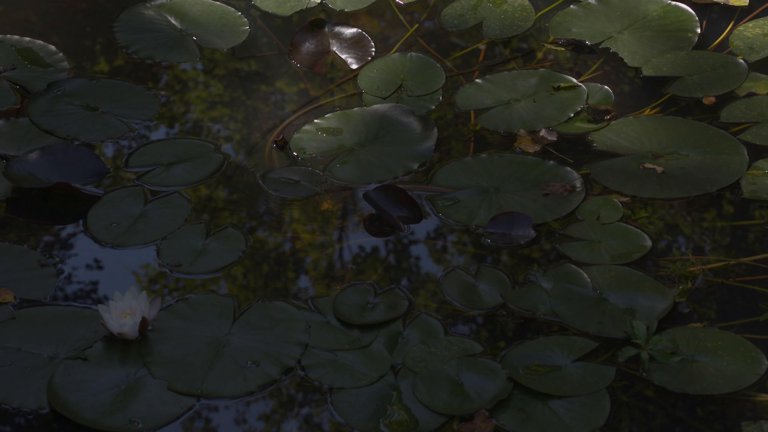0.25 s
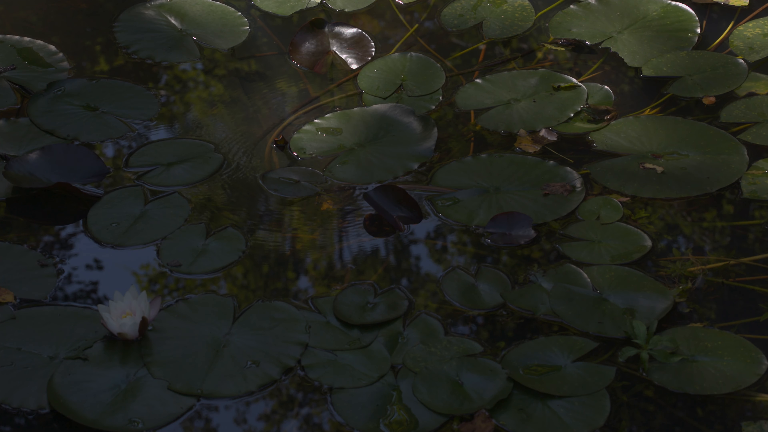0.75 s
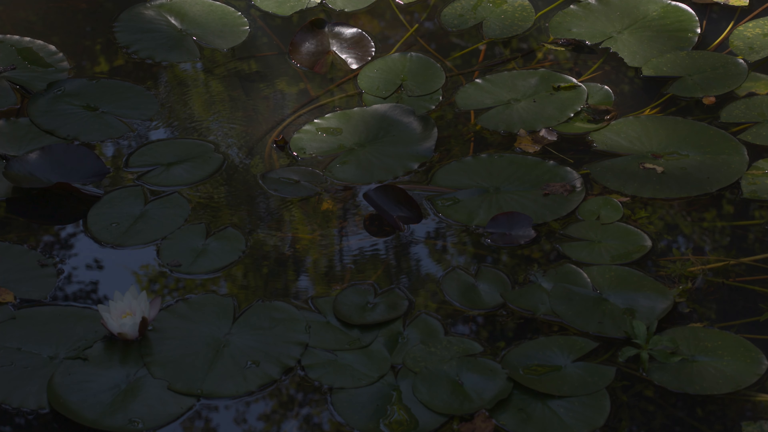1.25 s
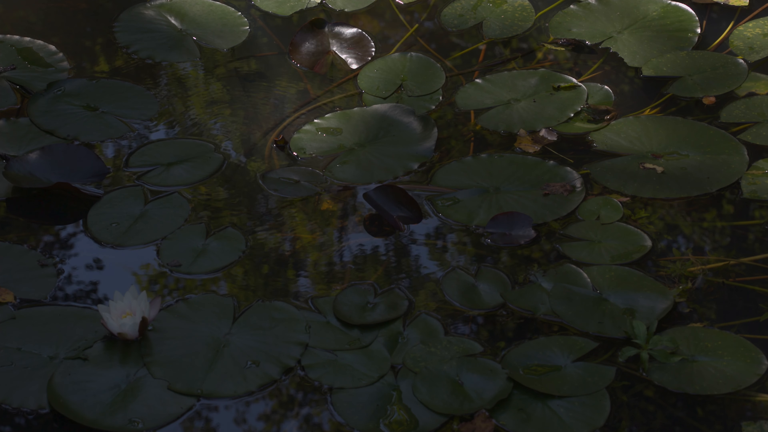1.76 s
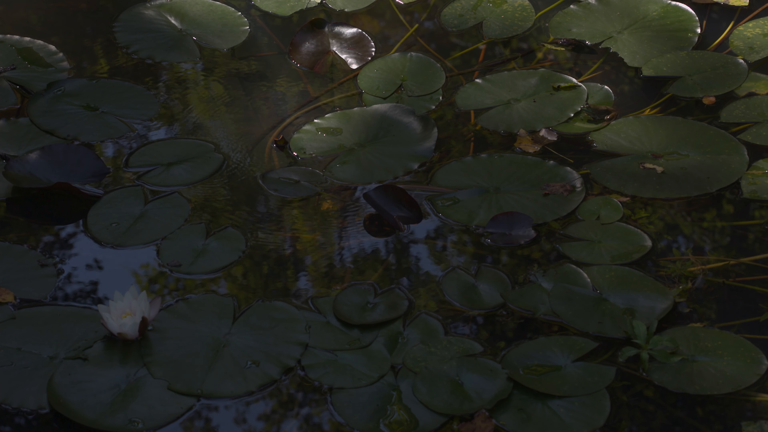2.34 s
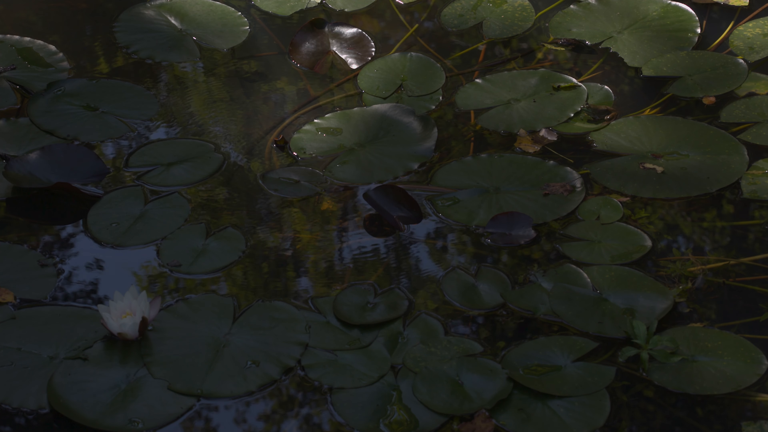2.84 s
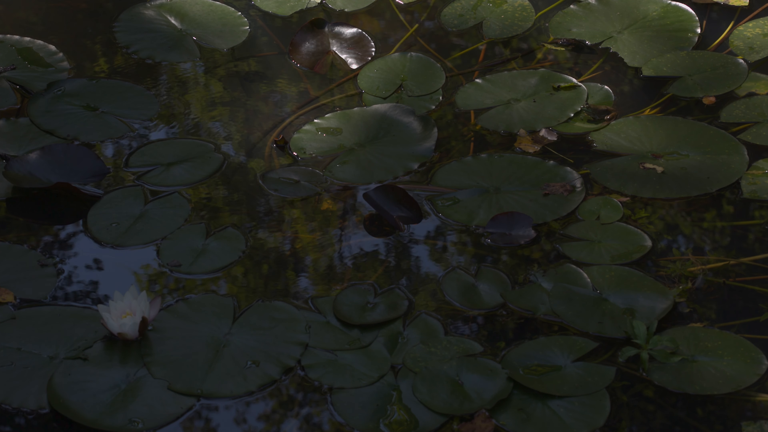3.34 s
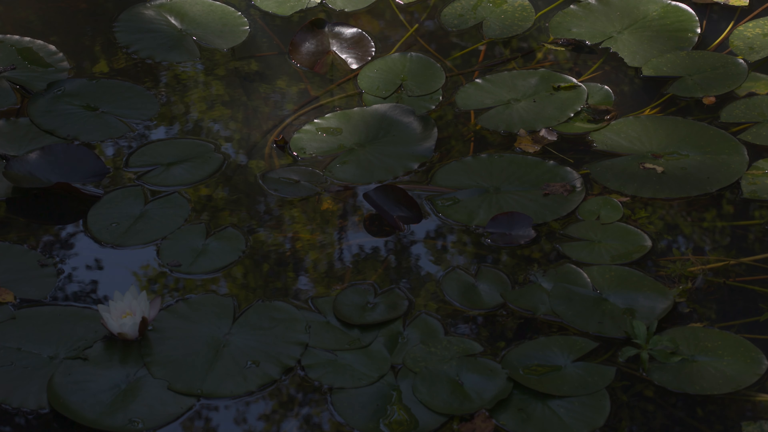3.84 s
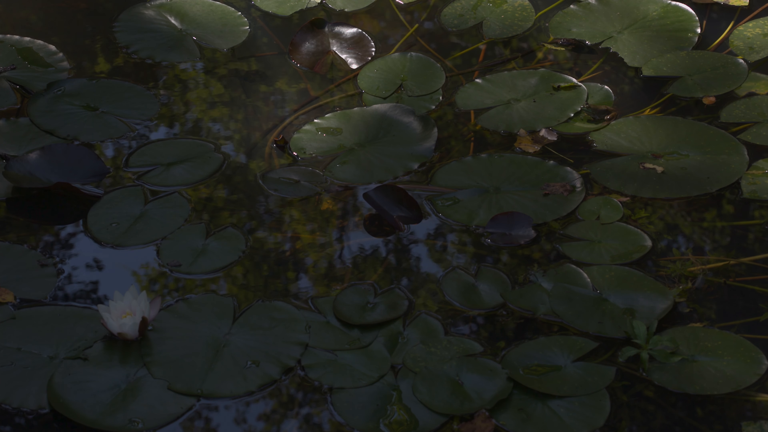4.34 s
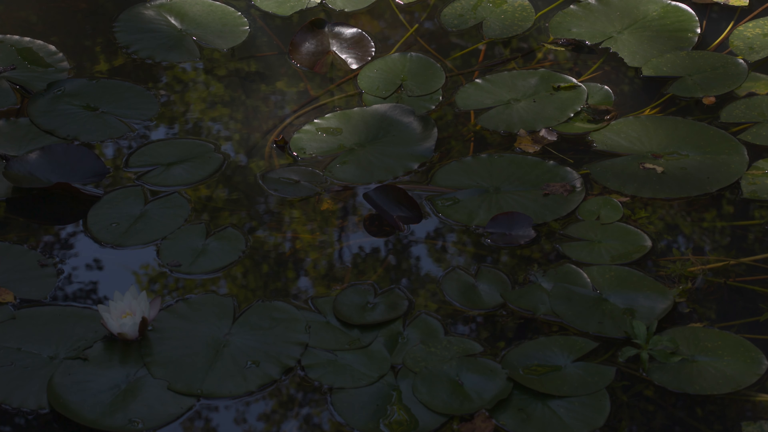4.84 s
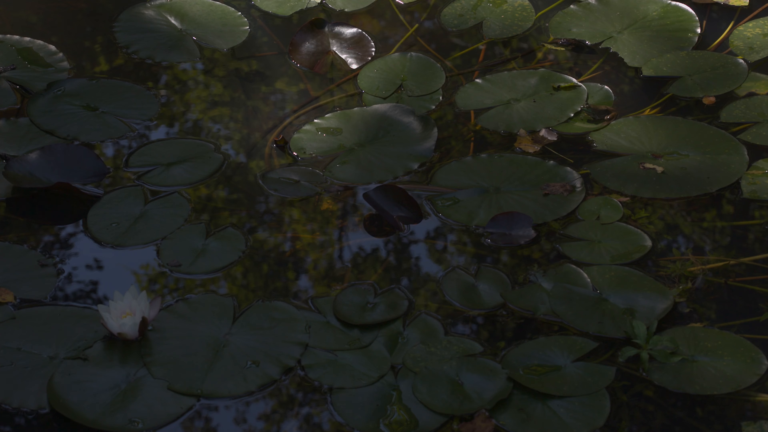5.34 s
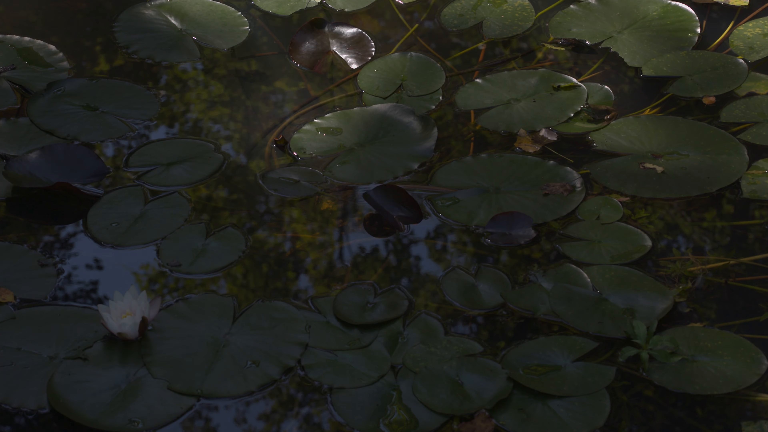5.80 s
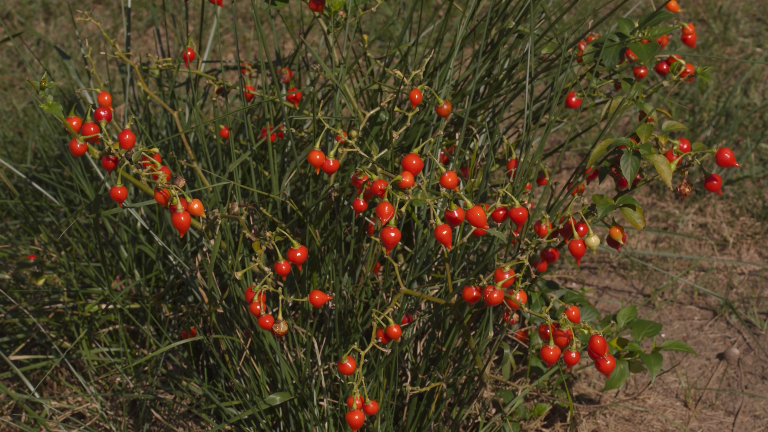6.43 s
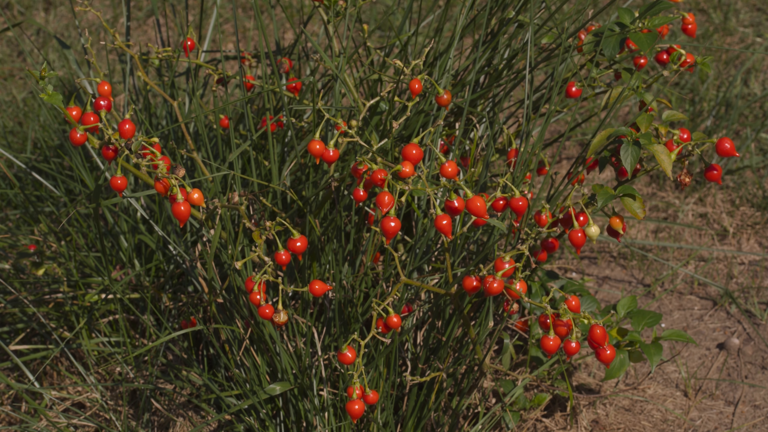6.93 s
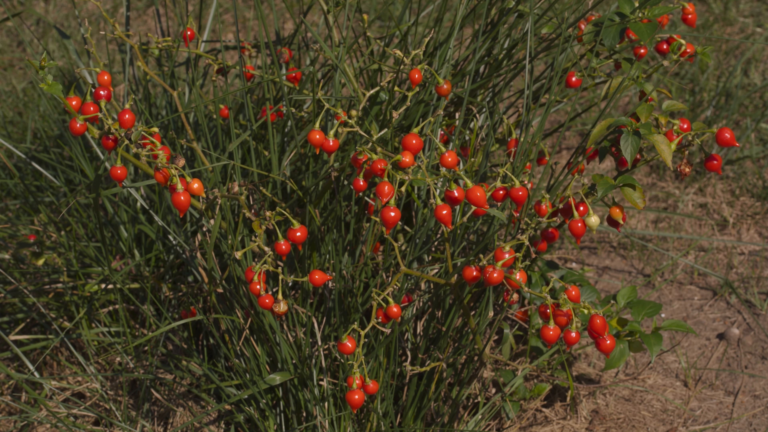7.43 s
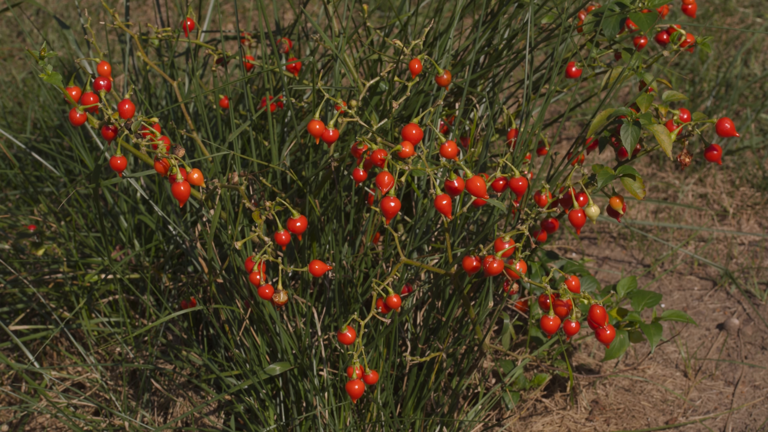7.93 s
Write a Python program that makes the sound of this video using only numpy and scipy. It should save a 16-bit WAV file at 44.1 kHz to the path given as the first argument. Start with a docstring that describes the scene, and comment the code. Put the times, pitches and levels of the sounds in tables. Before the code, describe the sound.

Beside a lily pond, one nearby cricket chirps in quick triple pulses over a shimmer of distant crickets, trills and faint, high katydid buzzes. A crow caws far across the water, at first sparsely, then in a run that echoes off the trees. The sound switches abruptly to a garden, where much closer crickets overlap with rasping buzzes and one soft low bump. A low outdoor rumble and faint hum continue throughout.

```python
"""A near field cricket chirps in threes beside a lily pond, over distant crickets, trills and katydid buzzes.
A crow caws far across the pond; at CUT_S the scene cuts to a sunny garden with closer, overlapping insects.
Wing strokes are gliding sines, buzzes throbbing noise, caws hoarse sines with tree echo.
A low outdoor rumble of shaped noise and a faint hum lie under both places."""
import sys
import numpy as np
from scipy import signal
from scipy.fft import rfft, irfft, next_fast_len
from scipy.io import wavfile
from scipy.ndimage import uniform_filter1d

SR = 44100
rng = np.random.default_rng(int(sys.argv[2]) if len(sys.argv) > 2 else 0)


def generate_wav(signal):
    """Clip the signal to [-1, 1] and save it as 16-bit WAV at the path in sys.argv[1]."""
    frames = np.transpose(np.atleast_2d(signal))
    scaled = np.clip(frames, -1, 1) * 32767
    pcm = np.round(scaled).astype(np.int16)
    wavfile.write(sys.argv[1], SR, pcm)


N = 359856

CUT_S, TOP_HZ = 6.298, 15750
HOARSE_PER_S, HOARSE_MAX = 4.6, .63  # the longer a caw, the hoarser (0-1)

# near pond cricket's chirps: mid first stroke t/s, base level/dB
POND_CHIRPS = [(-.053, -25), (.297, -25.5), (.710, -25.5), (1.046, -25.5), (1.403, -25.5), (1.763, -25.5),
               (2.101, -26), (2.418, -26), (2.824, -25), (3.144, -25.5), (3.489, -27), (3.869, -26),
               (4.237, -26), (4.579, -24.5), (4.997, -27), (5.622, -27), (6.010, -26.5)]
# wing strokes of one chirp: delay t/s, length t/s, relative level/dB
CHIRP_STROKES = [(0, 0.022, 0.5), (.037, 0.031, 0.5), (.078, .027, 1)]
# garden field crickets, by name: stroke spacing t/s, stroke length t/s, pitch fall/share;
# offsets of a chirp's first stroke: level/dB, flatter/share, shorter/share
GARDEN_SINGERS = {"loud": (.0385, .026, .125, -.3, .015, .25), "high": (.038, .023, .09, -7, .035, .2),
                  "low": (.038, .024, .11, -6, .035, .35), "brisk": (.0345, .017, .07, -6, .03, .2)}
# garden chirps: mid first stroke t/s, singer, strokes/count, base f/Hz, base level/dB
GARDEN_CHIRPS = [(6.313, "loud", 2, 4790, -18), (6.328, "low", 3, 4580, -18),
                 (6.331, "high", 3, 5190, -18.5), (6.442, "brisk", 4, 4680, -18),
                 (6.578, "loud", 3, 4750, -17.3), (6.657, "high", 3, 5180, -20),
                 (6.736, "low", 3, 4600, -18.5), (6.766, "brisk", 2, 4800, -17.5),
                 (6.856, "loud", 2, 4810, -20), (6.879, "loud", 3, 4780, -18.3),
                 (6.968, "high", 3, 5190, -20), (7.038, "brisk", 3, 4830, -17),
                 (7.159, "low", 4, 4620, -18), (7.199, "loud", 3, 4790, -16.8),
                 (7.297, "high", 3, 5190, -20), (7.456, "low", 2, 4560, -26), (7.533, "loud", 2, 4770, -16),
                 (7.565, "brisk", 3, 4840, -17.5), (7.735, "low", 4, 4660, -18),
                 (7.753, "high", 3, 5190, -19.5), (7.792, "loud", 3, 4790, -16.3),
                 (7.897, "brisk", 2, 4890, -22.5), (8.048, "brisk", 4, 4790, -20),
                 (8.071, "loud", 3, 4770, -17)]
# trilling crickets: f/Hz, stroke rate/Hz, time of one stroke t/s, pitch fall/share,
# sounding part of cycle/share, rms level/dB
POND_TRILLS = [(3504, 45, 0.031, .1, .7, -66.5), (5648, 77, 0.0035, .1, .8, -53.5),
               (6970, 34, .01, 0.018, .7, -66.5), (8420, 16.5, .747, .06, .5, -63)]
GARDEN_TRILLS = [(5550, 77, 0.011, .08, .8, -45.5), (6485, 42, 0, .05, 0.53, -48.5),
                 (6850, 42, .01, .04, 0.72, -54)]
# pond trill that pauses: columns as above, level before the pause is cut out
PAUSING_TRILL = [(6510, 42, 0, .04, .7, -60)]
# its pause: from t/s, to t/s
PAUSE_S = (3.1, 3.78)
# two close garden trills drifting in and out of step: columns as above
NEAR_TRILLS = [(8370, 18.08, 6.739, .09, .46, -40.6), (8300, 17.1, 7.424, .03, .38, -43.8)]
# crow caws: start t/s, length t/s, top f/Hz, direct rms level/dB
CAWS = [(0.145, 0.092, 1220, -55.5), (1.423, 0.16, 1260, -57), (3.142, 0.18, 1440, -46),
        (3.438, 0.093, 1397, -39.5), (3.719, 0.092, 1400, -39.5), (4.02, 0.13, 1370, -40.5),
        (4.348, .08, 1390, -40), (4.658, .085, 1410, -40), (4.98, 0.18, 1394, -49.5),
        (5.328, .23, 1406, -51.5), (5.725, 0.17, 1403, -48), (6.088, 0.19, 1420, -49)]
# katydid buzzes: start t/s, length t/s, rms level at the end/dB (garden: before the ground reflection)
POND_BUZZES = [(.45, .47, -62), (1.15, .6, -66), (1.95, .48, -63), (2.85, .68, -64), (3.62, .58, -59.5),
               (5.15, .9, -59.5)]
POND_HIGH_BUZZES = [(.55, .4, -66), (2, .48, -62), (3.8, .42, -66)]
GARDEN_BUZZES = [(6.1, 1.71, -35.8), (7.97, .8, -39)]
# katydid rasp spectra: f/Hz, relative density level/dB
POND_BUZZ_COLOUR = [(7000, -40), (10000, -1), (12300, 8), (14000, 2), (15000, 4), (16000, -13)]
GARDEN_BUZZ_COLOUR = [(6000, -37), (8800, -9), (10500, -2.5), (12000, 0), (13600, -0.5), (14400, -2),
                      (16000, -7)]
HIGH_BUZZ_COLOUR = [(8000, -27), (11000, -6), (14000, 5), (15200, 11), (16000, -13)]
# merged far insect spectra: f/Hz, relative density level/dB
POND_FAR = [(3900, -39), (4120, -17), (4280, -5), (4600, 0.5), (5000, -1), (5250, -1), (5600, -6),
            (6000, -13), (6450, -19), (7200, -31), (7700, -22), (8300, -14), (9000, -27), (11000, -57)]
GARDEN_FAR = [(3100, -38), (3900, -19.5), (4400, -3), (5100, 0.5), (5600, -3), (6000, -8), (6400, -12.5),
              (7200, -21.5), (8000, -4), (8700, -22), (11000, -37)]
# outdoor rumble spectra: f/Hz, relative density level/dB
POND_AIR = [(20, -14.5), (40, -3), (60, 0), (100, -3.5), (150, -9), (220, -20), (400, -25), (700, -26.5),
            (1100, -25), (2000, -30), (4000, -31.5), (9000, -32), (16000, -38.5)]
GARDEN_AIR = [(20, -15), (40, -0.5), (60, -1), (100, 0.5), (150, -8), (220, -19), (285, -17.5),
              (400, -24.5), (700, -27.5), (1100, -26.5), (2000, -29), (4000, -28.5), (16000, -42)]
# crow throat noise spectrum: f/Hz, relative density level/dB
CROW_RASP = [(600, -12), (850, -9), (1050, -11), (1250, 12), (1480, -10), (1650, -15), (2100, -6),
             (2700, -40)]
# tree cricket bed spectrum: f/Hz, relative density level/dB
TREE_CRICKETS = [(2950, -22.5), (3200, -2), (3450, -1.5), (3680, -0.5), (3820, -25), (5000, -60)]


def undb(db):
    """Decibels to gain."""
    return 10 ** (np.asarray(db) / 20)


def level(x, db):
    """Scale to an rms level."""
    return x * undb(db) / np.sqrt(np.mean(x ** 2) + 1e-18)


def clock():
    """Time of every sample, s."""
    return np.arange(N) / SR


def span(length_s):
    """Ramp from 0 to 1 lasting length_s."""
    return np.linspace(0, 1, max(int(length_s * SR), 2))


def add(out, start_s, x):
    """Mix a short sound in from start_s, trimmed to the scene."""
    i = int(round(start_s * SR))
    a, b = max(i, 0), min(i + len(x), N)
    if b > a:
        out[a:b] += x[a - i:b - i]


def walk(rate_hz, size=N):
    """Smooth random signal of rms 1: held values, twice averaged."""
    k = max(int(SR / rate_hz), 1)
    held = np.repeat(rng.standard_normal(size // k + 2), k)
    smooth = uniform_filter1d(uniform_filter1d(held, k), k)
    return level(smooth[:size], 0)


def noise(colour):
    """Noise of rms 1, its spectrum interpolated over log frequency."""
    size = next_fast_len(N, True)
    hz, db = np.transpose(colour)
    f_hz = np.maximum(np.arange(size // 2 + 1) * SR / size, 1)
    gain = undb(np.interp(np.log(f_hz), np.log(hz), db))
    spectrum = rfft(rng.standard_normal(size)) * gain
    return level(irfft(spectrum, size)[:N], 0)


def scatter(x, t60_s):
    """Diffuse echo from leaves and trees: unit-energy decaying noise tail."""
    t = np.arange(SR) / SR
    tail = rng.standard_normal(SR) * undb(-60 * t / t60_s)
    return signal.oaconvolve(x, tail / np.linalg.norm(tail))[:N]


def bounce(x, delay_s, db):
    """A sound together with one delayed reflection."""
    return x + undb(db) * np.interp(clock() - delay_s, clock(), x, left=0)


def wing(u, hz, fall, rise=0, overtone_db=-27, skew=1.2, edge=0.61, unsteady=.004):
    """Scraper runs along the file (u 0-1); pitch climbs as the wing speeds up and sags as it slows."""
    u = np.clip(u, 0, 1)
    speed = 1 - rise * (1 - u) ** 3 - fall * u ** 3
    pitch_hz = hz * speed * (1 + unsteady * walk(500, size=len(u)))
    phase = 2 * np.pi * np.cumsum(pitch_hz) / SR
    envelope = np.abs(np.sin(np.pi * u ** skew)) ** edge
    return envelope * (np.sin(phase) + undb(overtone_db) * np.sin(2 * phase))


def pond_cricket(hz=4950, fall=.15, leaves_db=-19, bank_s=.005, bank_db=-14):
    """Near field cricket, three strokes a chirp; an early reflection beats against each falling end."""
    out = np.zeros(N)
    for mid_s, db in POND_CHIRPS:
        for delay_s, length_s, stroke_db in CHIRP_STROKES:
            stroke = wing(span(length_s), hz, fall, overtone_db=-50, skew=1.25, edge=.95)
            add(out, mid_s + delay_s - length_s / 2, undb(db + stroke_db) * stroke)
    return bounce(out, bank_s, bank_db) + undb(leaves_db) * scatter(out, t60_s=0.3)


def far_crickets(low_hz, high_hz, db, count, period_s=.37, fall=0.1037):
    """Further field crickets, each on its own pitch and tempo, blurred by the grass."""
    out = np.zeros(N)
    for hz in np.linspace(low_hz, high_hz, count):
        chirp = np.zeros(N)
        for delay_s, length_s, stroke_db in CHIRP_STROKES:
            add(chirp, delay_s, undb(stroke_db) * wing(span(length_s), hz, fall, overtone_db=-45))
        mean_gap_s = period_s * rng.uniform(.85, 1.2)
        gaps_s = mean_gap_s * (1 + .08 * rng.standard_normal(size=32))
        for start_s in np.cumsum(gaps_s) - rng.uniform(.5, 1):
            add(out, start_s, chirp[:SR // 4] * undb(1.5 * rng.standard_normal()))
    return level(out + .55 * scatter(out, t60_s=.18), db)


def shimmer(colour, rate_hz, flicker_db):
    """Countless far insects merge into a noise bed that barely flickers."""
    return noise(colour) * undb(flicker_db * walk(rate_hz))


def trills(table, wet):
    """Crickets beat their wings on and on; strokes vary in pitch and strength; wet is the echo's power share."""
    out = 0
    for hz, rate_hz, stroke_s, fall, share, db in table:
        beats = rate_hz * (clock() - stroke_s) + .025 * walk(4)
        stroke, cycle = np.divmod(beats, 1)
        detune, force = rng.standard_normal(size=(1024, 2))[stroke.astype(int)].T
        pitch_hz = hz * (1 + .004 * detune)
        song = wing(cycle / share, pitch_hz, fall, rise=fall / 2, overtone_db=-45, skew=1, edge=1)
        out = out + level(song * undb(1.3 * force), db)
    wet = np.clip(wet, 0, 1)
    return np.sqrt(1 - wet) * out + np.sqrt(wet) * scatter(out, t60_s=0.54)


def tree_crickets(db=-61.5):
    """Tree crickets merged into a steady band of noise."""
    return level(noise(TREE_CRICKETS), db)


def bouts(table, rest_db, swell_db, attack_s, release_s):
    """Katydid effort: each buzz sets in, swells and breaks off over a faint rasp of others."""
    t, power = clock(), undb(rest_db) ** 2
    for start_s, length_s, db in table:
        attack = (t - start_s) / attack_s
        release = 1 + (start_s + length_s - t) / release_s
        gate = np.clip(np.minimum(attack, release), 0, 1)
        to_go = np.clip(1 - (t - start_s) / length_s, 0, 1)
        power = power + (gate * undb(db - swell_db * to_go)) ** 2
    return np.sqrt(power)


def katydids(effort, colour, rates_hz, throb_db, rasp_db):
    """Broad rasp of tooth strikes that swells with each wing stroke; the tempos drift."""
    throb = sum(np.sin(2 * np.pi * (hz * clock() + 0.3 * walk(5))) for hz in rates_hz)
    rasp = noise(colour) * undb(throb_db * throb + rasp_db * walk(1500))
    return level(rasp, 0) * effort


def air(colour, db):
    """Low outdoor rumble: steady shaped noise."""
    return level(noise(colour), db)


def hum(hz=58.5, db=-53):
    """Faint hum of distant machinery: a sine wavering in phase and level."""
    tone = np.sin(2 * np.pi * (hz * clock() + 0.097 * walk(3.03)))
    return level(tone * undb(2 * walk(2.8)), db)


def crow(rattle_hz=75, flank_db=-31, rasp_db=-10, echo_db=-4.2, echo_t60_s=0.9):
    """Distance leaves little but the strongest harmonic of each hoarse caw; the trees echo it."""
    direct, sent, throat = np.zeros(N), np.zeros(N), noise(CROW_RASP)
    for start_s, length_s, hz, db in CAWS:
        u = span(length_s)
        size = len(u)
        hoarse = min(HOARSE_PER_S * length_s, HOARSE_MAX)
        rattle_rate_hz = rattle_hz * (1 + 0.28 * walk(62, size=size))
        rattle = np.sin(2 * np.pi * np.cumsum(rattle_rate_hz) / SR)
        arch = .08 * (2 * u - .85) ** 2
        pitch_hz = hz * (1 - arch + .052 * hoarse * walk(500, size=size))
        phase = 2 * np.pi * np.cumsum(pitch_hz) / SR
        flanks = np.sin(phase * 2 / 3) + np.sin(phase * 4 / 3)  # neighbouring harmonics
        swell = np.abs(np.sin(np.pi * u)) ** .75 * (1 + .8 * hoarse * rattle)
        swell = swell * undb(3.9 * hoarse * walk(58.3, size=size))  # a hoarse voice breaks up
        rasp = throat[int(start_s * SR):][:size] * hoarse * undb(rasp_db)
        caw = level((np.sin(phase) + undb(flank_db) * flanks + rasp) * swell, db)
        add(direct, start_s, caw)
        add(sent, start_s + .04, caw * undb(echo_db))
    return direct + scatter(sent, echo_t60_s)


def garden_crickets(warm_up_strokes=.6, leaves_db=-22, ground_db=-15, scatter_db=.7):
    """Close field crickets overlap and beat; chirps start soft, flat and short, and bounce off the ground."""
    out = np.zeros(N)
    for mid_s, singer, count, hz, db in GARDEN_CHIRPS:
        gap_s, length_s, fall, soft_db, flat, short = GARDEN_SINGERS[singer]
        for k in range(round(count)):
            cold = np.exp(-k / warm_up_strokes)
            u = span(length_s * (1 - short * cold))
            stroke = wing(u, hz * (1 - flat * cold), fall, rise=.02, overtone_db=-24.5,
                          skew=1.05, edge=.7, unsteady=.007)
            stroke = stroke * undb(db + soft_db * cold + scatter_db * rng.standard_normal())
            start_s = mid_s + k * gap_s - len(u) / SR / 2
            add(out, start_s, stroke)
            add(out, start_s + rng.uniform(.001, .0036), undb(ground_db) * stroke)
    return out + undb(leaves_db) * scatter(out, t60_s=0.041)


def thump(start_s=7.255, db=-33, low_hz=105, high_hz=155, peak_s=.012):
    """One soft low bump: two sines under a quick swell and decay."""
    out, t = np.zeros(N), np.arange(SR // 4) / SR
    swell = t / peak_s * np.exp(1 - t / peak_s)
    tone = np.sin(2 * np.pi * low_hz * t) + .4 * np.sin(2 * np.pi * high_hz * t)
    add(out, start_s, undb(db) * swell * tone)
    return out


def pond():
    """One near cricket and a crow over a chorus that merges into a shimmer with distance."""
    # neighbours nearly hold their pitch
    neighbours = far_crickets(4890, 4915, db=-47, count=2, period_s=.3, fall=0.014)
    bed = level(shimmer(POND_FAR, rate_hz=30, flicker_db=.7), -43.5)
    chorus = far_crickets(4650, 5150, db=-43.5, count=8) + bed
    singing = 1. * ((clock() < PAUSE_S[0]) | (clock() > PAUSE_S[1]))
    singing = uniform_filter1d(singing, size=2000)
    small = trills(POND_TRILLS, wet=0.63) + singing * trills(PAUSING_TRILL, wet=0.78) + tree_crickets()
    effort = bouts(POND_BUZZES, rest_db=-69, swell_db=2.5, attack_s=.15, release_s=.08)
    buzz = katydids(effort, POND_BUZZ_COLOUR, rates_hz=(64, 40), throb_db=1, rasp_db=-2.0)
    effort = bouts(POND_HIGH_BUZZES, rest_db=-85, swell_db=1.5, attack_s=.1, release_s=.08)
    high = katydids(effort, HIGH_BUZZ_COLOUR, rates_hz=(65,), throb_db=1, rasp_db=2)
    return pond_cricket() + neighbours + chorus + small + buzz + high + crow() + air(POND_AIR, -45.5)


def garden():
    """Much closer insects among the grasses; a broad buzz breaks off and resumes, a higher one sings on."""
    bed = level(shimmer(GARDEN_FAR, rate_hz=40, flicker_db=1.3), -37.5)
    chorus = far_crickets(4550, 5150, db=-39, count=7) + bed
    small = trills(GARDEN_TRILLS, wet=0.033) + trills(NEAR_TRILLS, wet=.07)
    effort = bouts(GARDEN_BUZZES, rest_db=-49, swell_db=8, attack_s=.12, release_s=.06)
    broad = katydids(effort, GARDEN_BUZZ_COLOUR, rates_hz=(41, 57), throb_db=2, rasp_db=2.5)
    high = katydids(undb(-44), HIGH_BUZZ_COLOUR, rates_hz=(65,), throb_db=-1.0, rasp_db=3.0)
    buzz = bounce(broad, delay_s=.0033, db=-7) + high
    return garden_crickets() + chorus + small + buzz + thump() + air(GARDEN_AIR, -44.5)


def scene():
    """The pond gives way abruptly to the garden; the hum runs under both."""
    in_garden = np.clip((clock() - CUT_S) / 0.0024 + .5, 0, 1)
    return (pond() * (1 - in_garden) + garden() * in_garden + hum())[None]


def record(dry):
    """Steep elliptic low-pass removes everything above TOP_HZ."""
    top_cut = signal.ellip(10, .1, 80, TOP_HZ, fs=SR, output="sos")
    return signal.sosfilt(top_cut, dry)


dry = scene()
out = record(dry)
generate_wav(out)
```